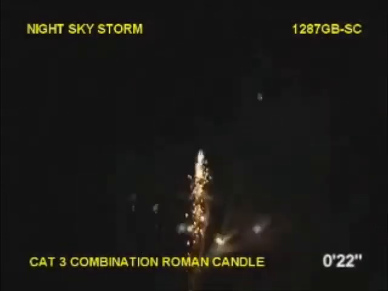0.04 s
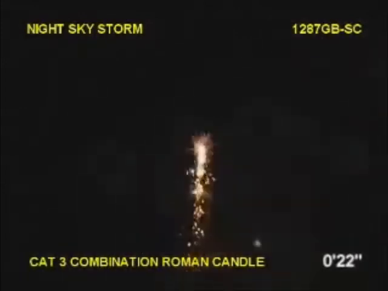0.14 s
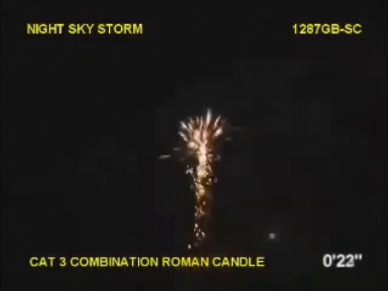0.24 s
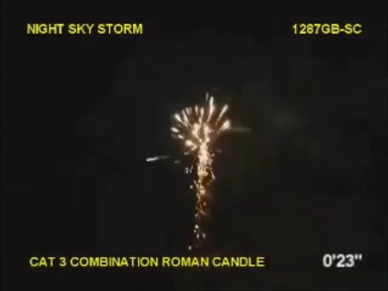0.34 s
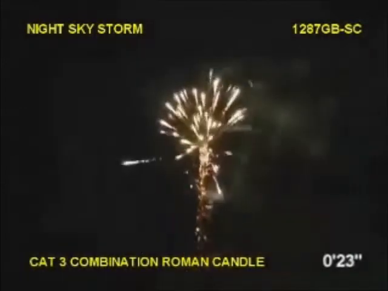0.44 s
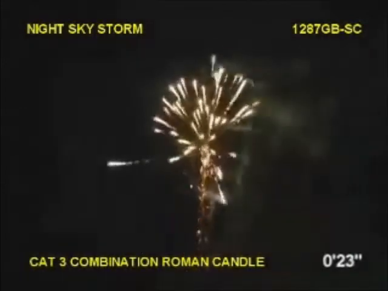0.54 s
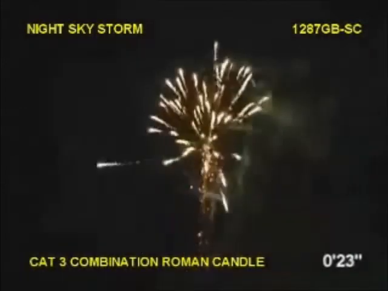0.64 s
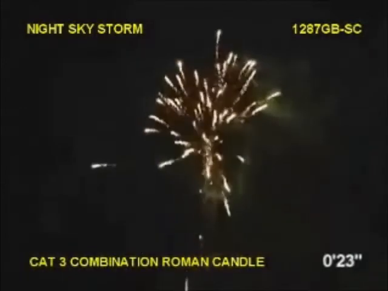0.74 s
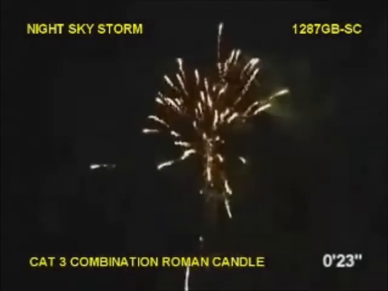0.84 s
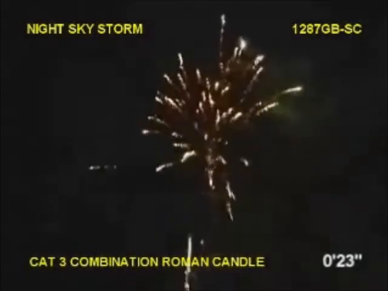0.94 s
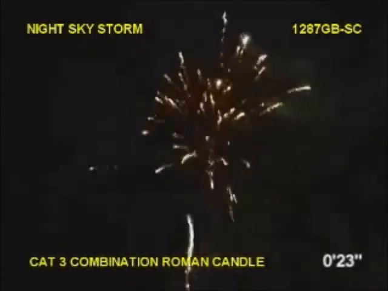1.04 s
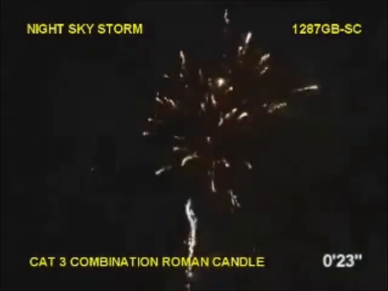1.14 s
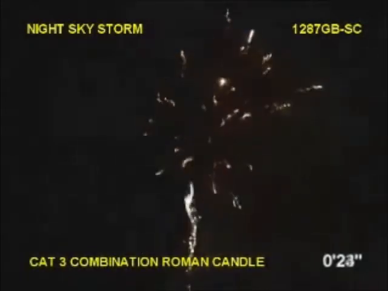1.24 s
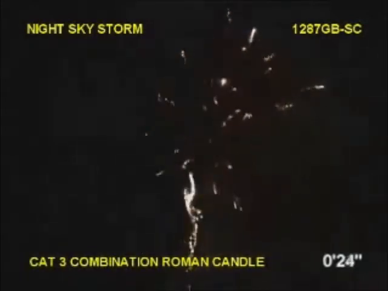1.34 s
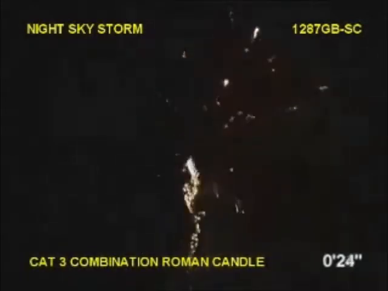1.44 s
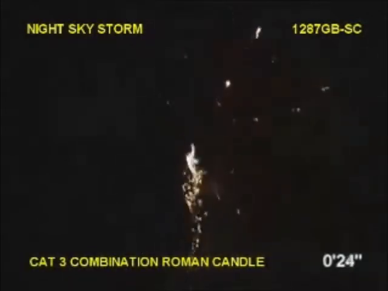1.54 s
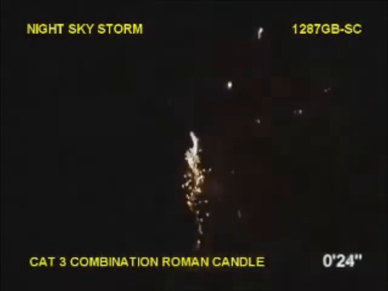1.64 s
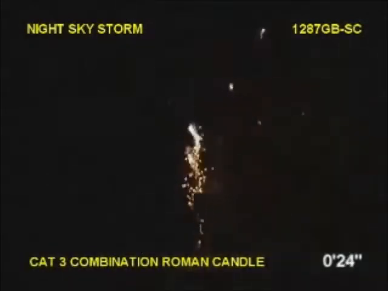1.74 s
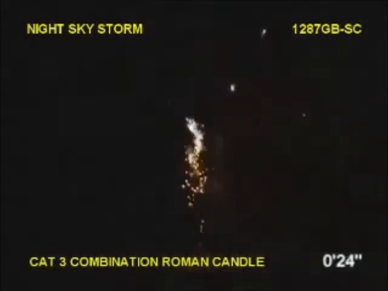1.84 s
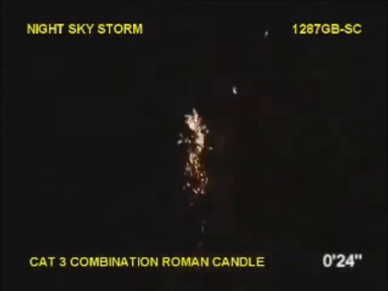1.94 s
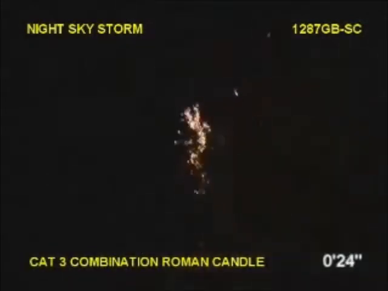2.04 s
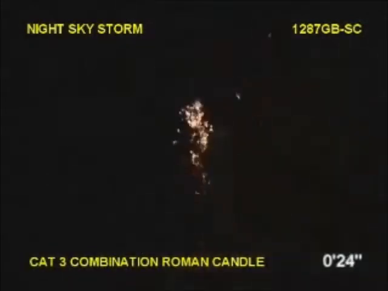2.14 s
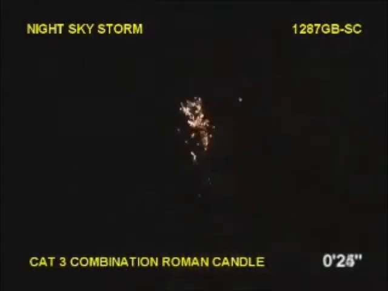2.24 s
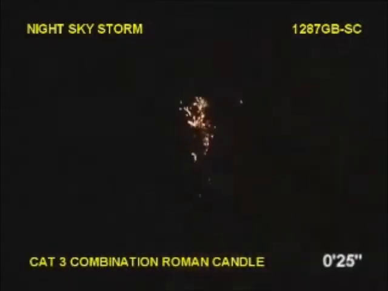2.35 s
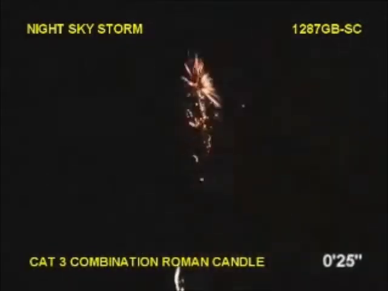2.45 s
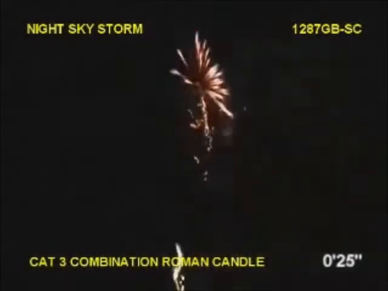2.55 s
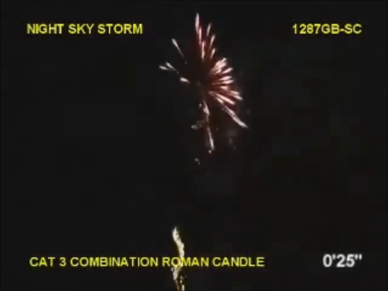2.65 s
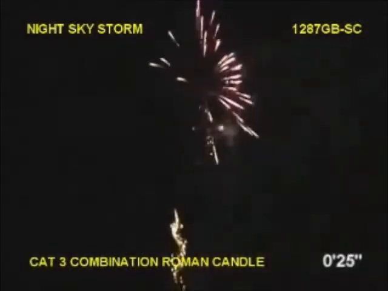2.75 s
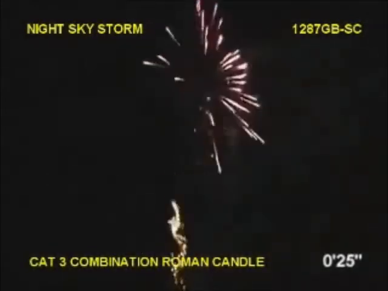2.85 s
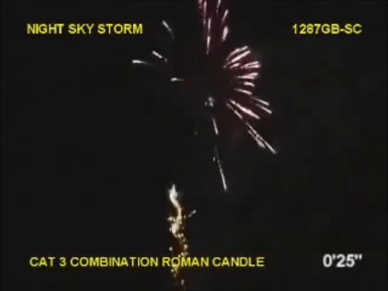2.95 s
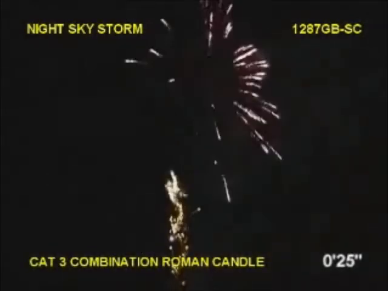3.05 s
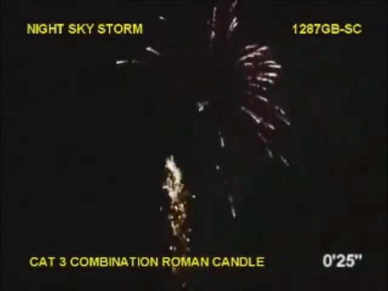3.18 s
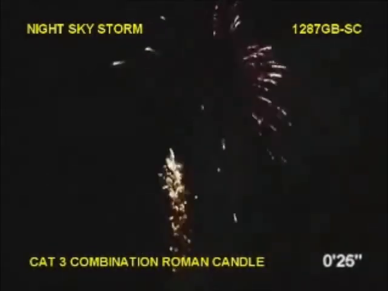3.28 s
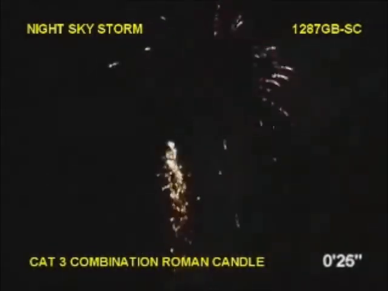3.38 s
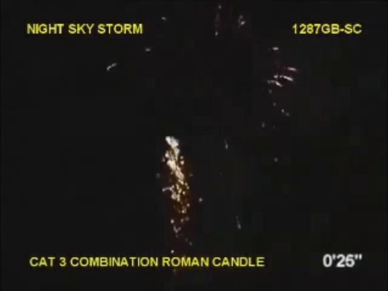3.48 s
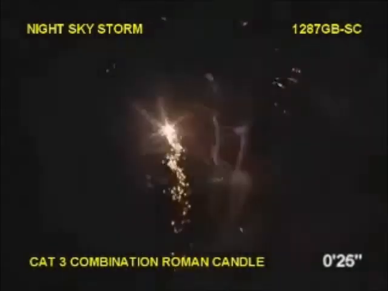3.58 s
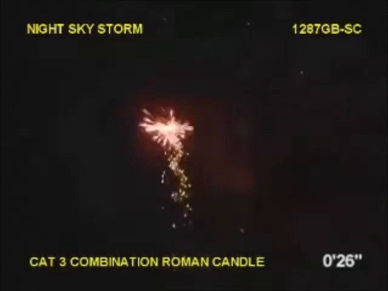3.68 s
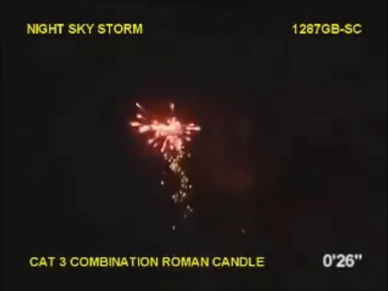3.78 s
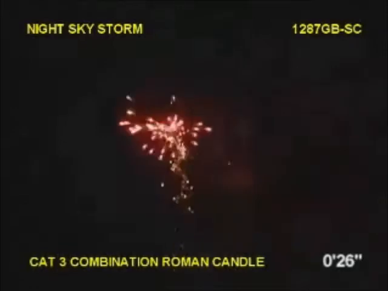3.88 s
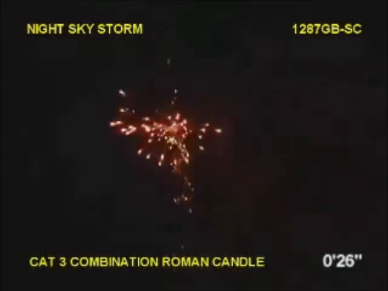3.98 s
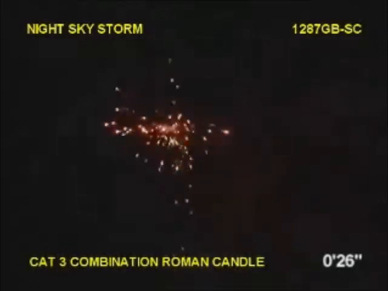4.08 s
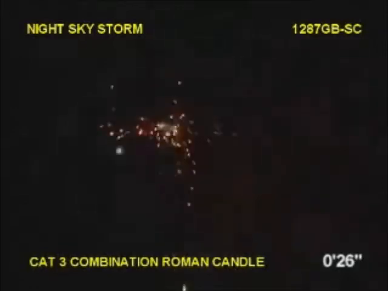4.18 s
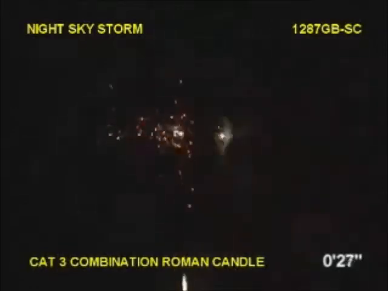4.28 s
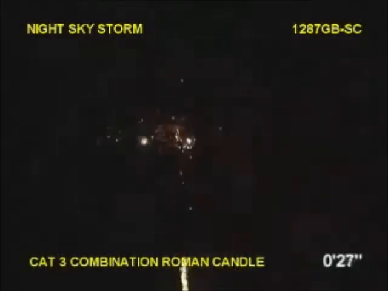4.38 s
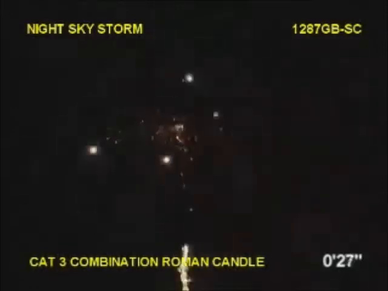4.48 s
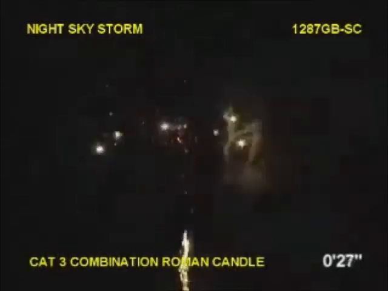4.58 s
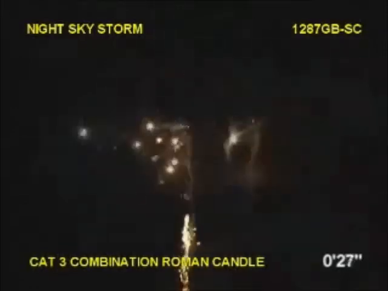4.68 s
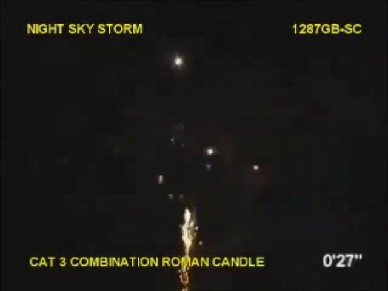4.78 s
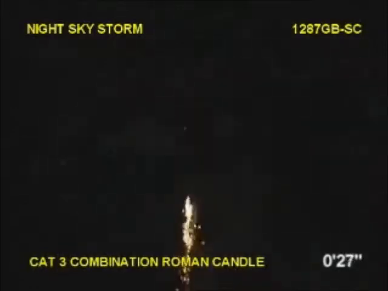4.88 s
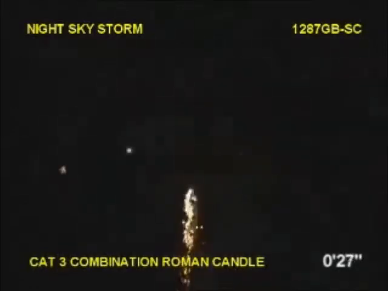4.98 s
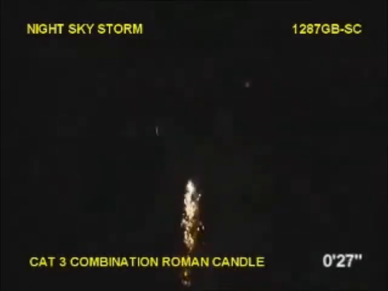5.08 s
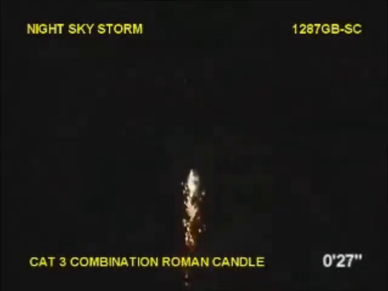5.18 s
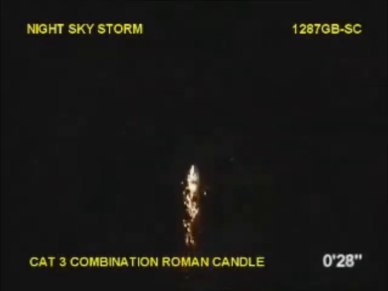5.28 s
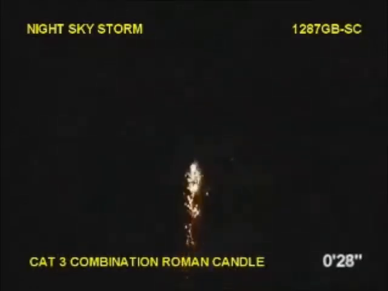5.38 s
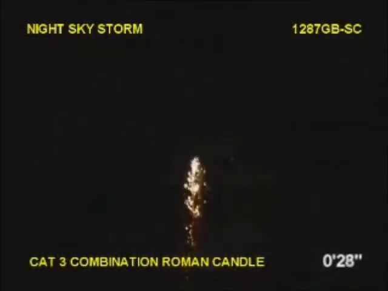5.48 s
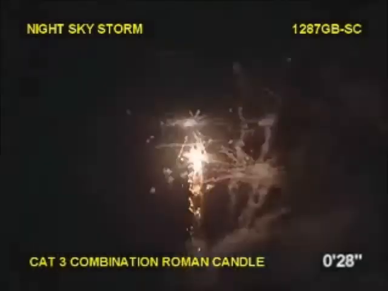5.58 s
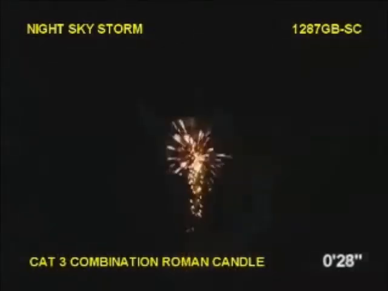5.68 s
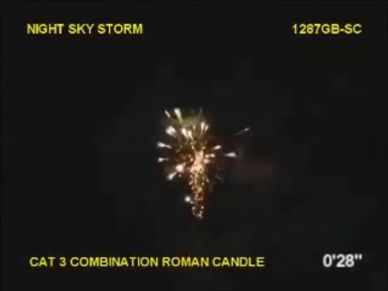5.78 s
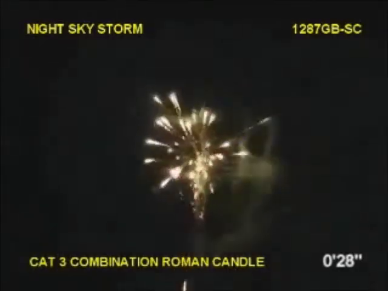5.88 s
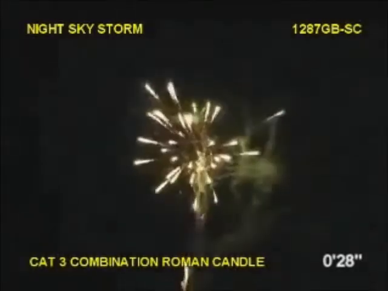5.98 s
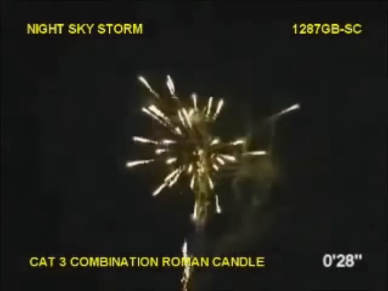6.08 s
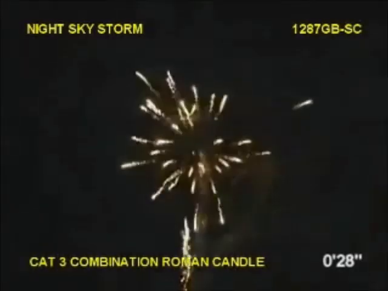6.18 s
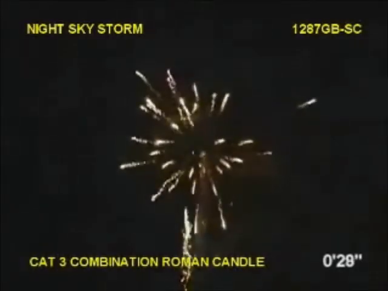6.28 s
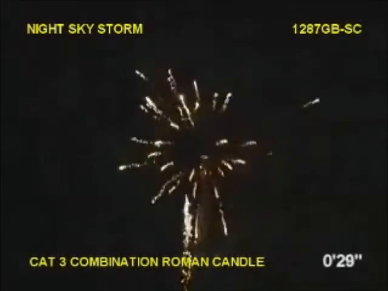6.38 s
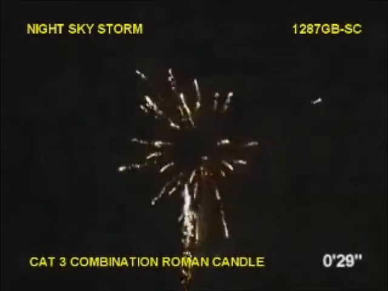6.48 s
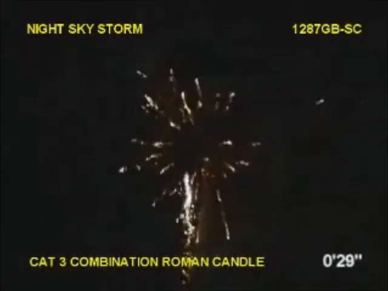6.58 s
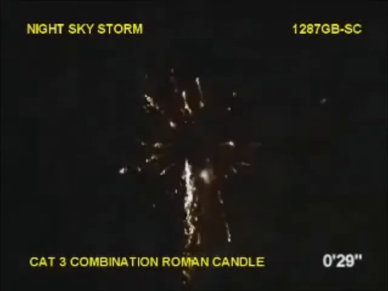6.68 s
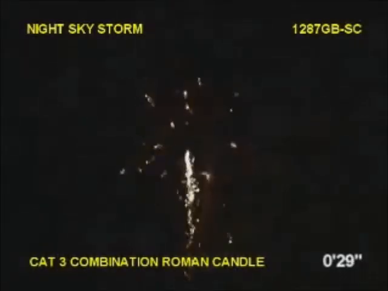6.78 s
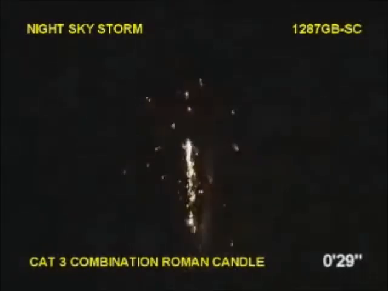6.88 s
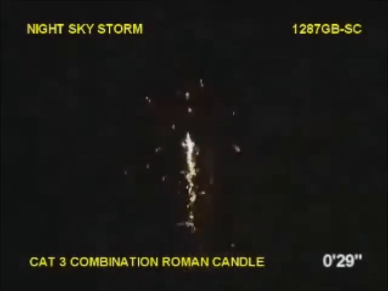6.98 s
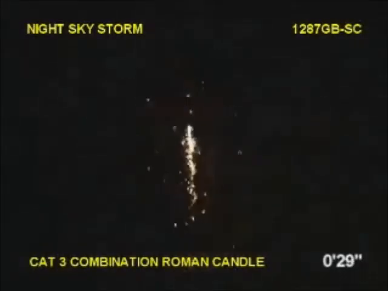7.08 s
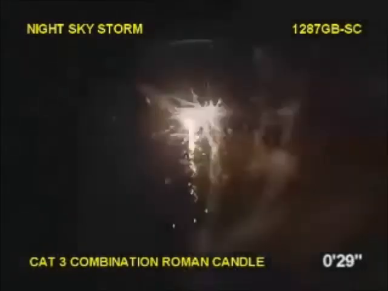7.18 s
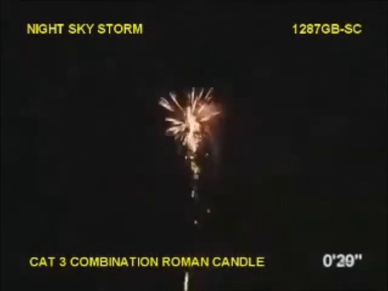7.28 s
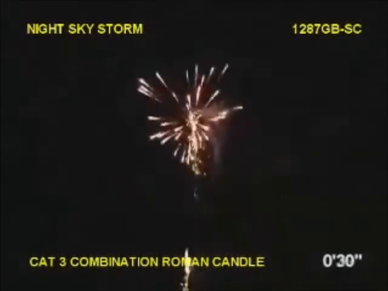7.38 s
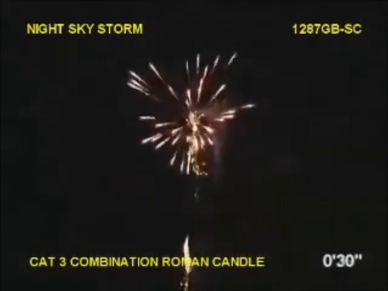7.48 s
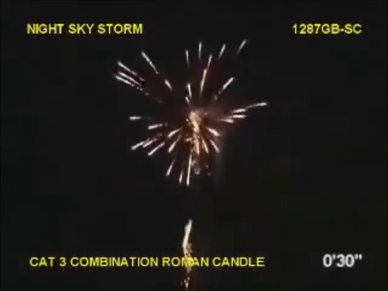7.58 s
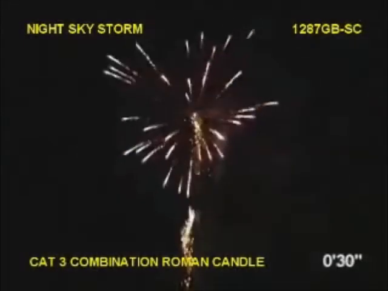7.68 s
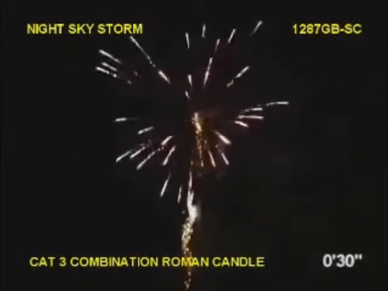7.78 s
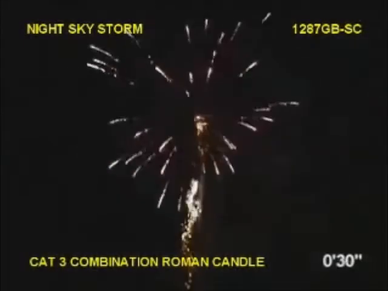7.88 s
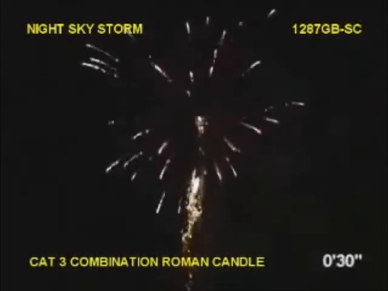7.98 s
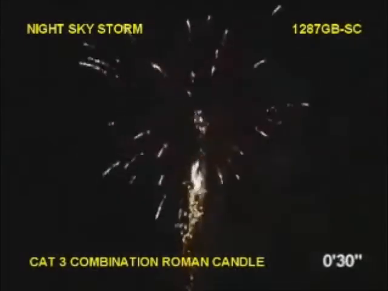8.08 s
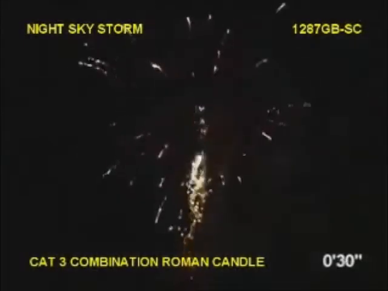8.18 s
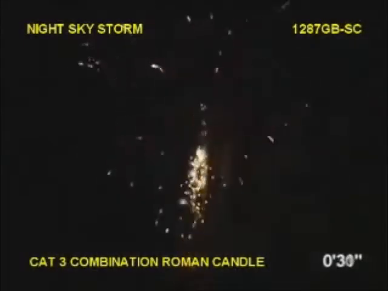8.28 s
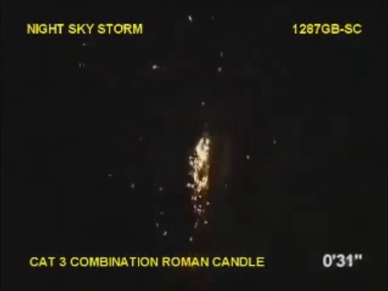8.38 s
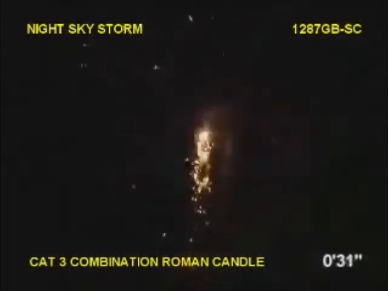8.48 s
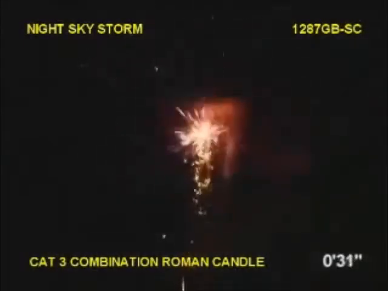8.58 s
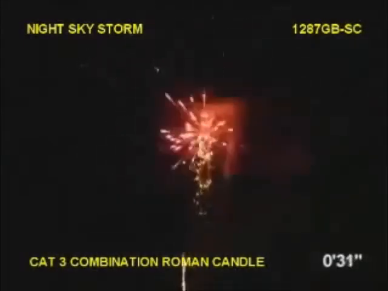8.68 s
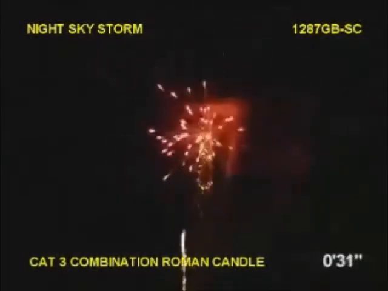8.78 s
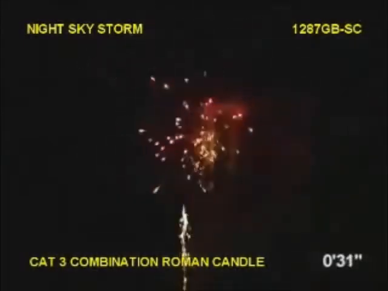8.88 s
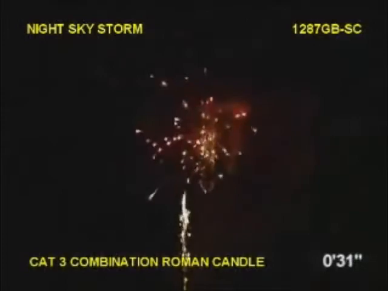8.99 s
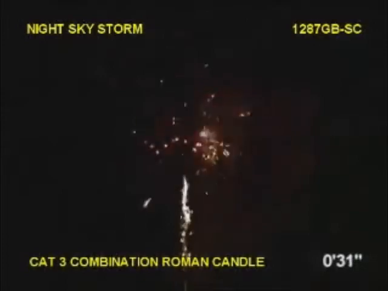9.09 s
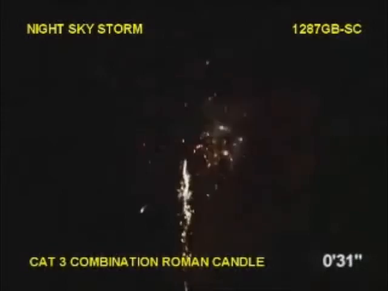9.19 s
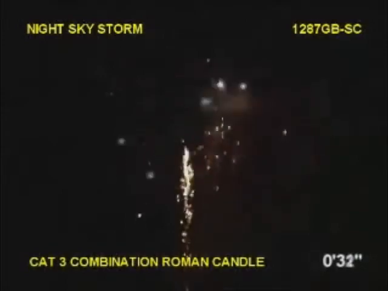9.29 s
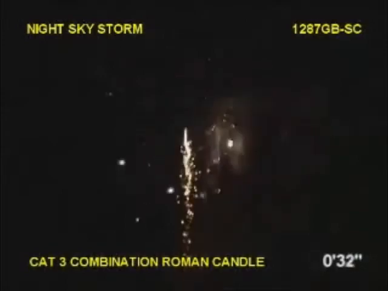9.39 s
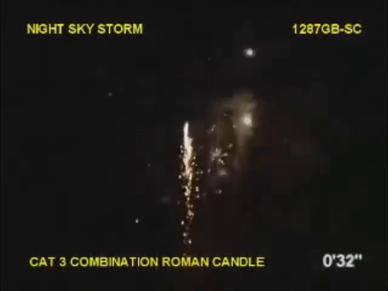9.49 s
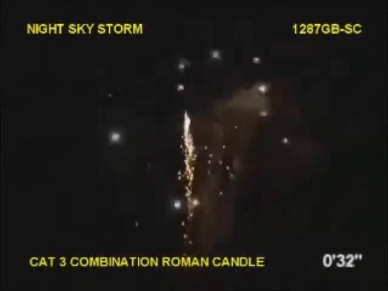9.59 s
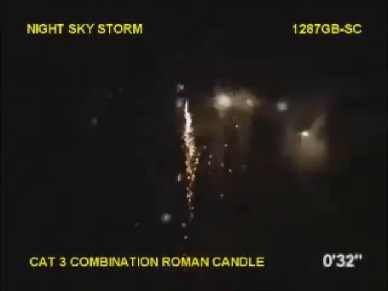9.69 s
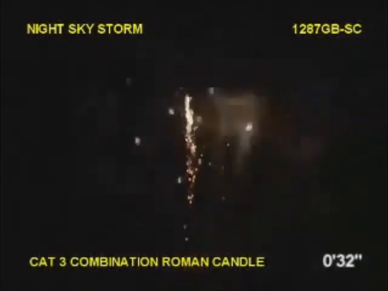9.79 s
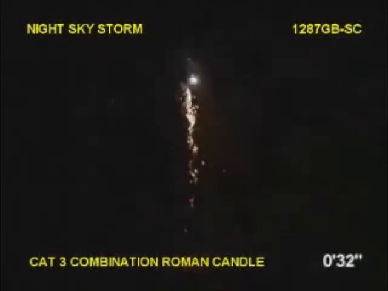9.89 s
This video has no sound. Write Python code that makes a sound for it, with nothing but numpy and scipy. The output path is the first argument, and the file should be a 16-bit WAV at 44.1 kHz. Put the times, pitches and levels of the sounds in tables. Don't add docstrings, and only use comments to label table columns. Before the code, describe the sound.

Spaced firework bangs crack and echo off nearby walls, with cardboard launch thumps between them and dense, snappy crackling coming in volleys.

```python
import sys
import numpy as np
from scipy import signal
from scipy.fft import rfft, irfft
from scipy.io import wavfile
from scipy.ndimage import uniform_filter1d

SR = 44100
rng = np.random.default_rng(int(sys.argv[2]) if len(sys.argv) > 2 else 0)


def invert_db(x):
    u = np.asarray(x, float) / 20
    return 10 ** u


def int16_out(signal):
    q = np.round(np.clip(np.atleast_2d(signal).T, -1, 1) * 32767)
    wavfile.write(sys.argv[1], SR, q.astype(np.int16))


N = 438351

# (time at left [s], time at right [s], charge level [dB], ground echo at right [ms])
BURSTS = [
    (.3665, .4565, -1.5, 2.6),
    (2.6236, 2.7103, 0., 3.2),
    (3.8435, 3.9326, .5, 2.6),
    (5.8377, 5.9286, 0., 2.6),
    (7.3973, 7.4865, .5, 2.6),
    (8.6932, 8.7833, .5, 2.5),
]
# (delay [ms], level [dB], bandwidth [Hz], polarity [factor])
BURST_WALLS = [
    [(158, -14, 790, 0.53), (210.5, -14.5, 1200, 0.88), (243, -15, 900, 1), (252, -28, 2100, 0.34), (430, -8, 410, 0.39)],
    [(14, -18, 3800, 1), (61.1, -22.5, 1050, 0.64), (107.6, -7.5, 3800, -0.24), (148.9, -28.5, 3000, 1), (159.5, -18, 1800, -0.37), (164.3, -9, 286, 0.36), (232, -37, 3700, 0.92), (239.3, -24.5, 570, -1.24), (342, -37, 1000, -0.48), (401.7, -33, 180, 1)],
]


def bursts():
    near = dull(blast(push_ms=.3, ring_hz=260, ring_ms=1.8, ring_db=-9., turn=.54), 2400)
    far = dull(blast(push_ms=.6, ring_hz=285, ring_ms=2.0, ring_db=-11., turn=.58), 4400)
    left, right = np.zeros((2, N))
    for s, _, db, _ in BURSTS:
        left += shot(s, db - 0.5, near, .57, -0.3, BURST_WALLS[0], side=0, wet_db=0.5)
    for _, s, db, echo_ms in BURSTS:
        right += shot(s, db + 19.0, far, echo_ms, 0.32, BURST_WALLS[1], side=1, wet_db=-10.5)
    return np.array([left, right])


# (time at left [s], time at right [s], charge level [dB])
LIFTS = [
    (0.611, 0.715, 12),
    (2.2192, 2.3174, 6),
    (5.718, 5.816, 6),
    (7.074, 7.174, 7.5),
    (8.472, 8.571, 10.5),
]
# (delay [ms], level [dB], bandwidth [Hz], polarity [factor])
LIFT_WALLS = [
    [(33.3, 3, 580, 0.21), (221, -11.5, 1300, -0.85), (248, -8, 700, 0.69)],
    [(14.03, -13, 1600, 0.65), (31.4, 9.5, 530, 0.13), (46, -4.5, 760, 0.6), (109.7, -8.5, 4000, -0.84), (155.2, -14.5, 2500, 1), (250.4, -5.5, 1400, 0.23), (287, -19.5, 1200, 0.77)],
]


def lifts():
    thump = dull(blast(push_ms=.65, ring_hz=300, ring_ms=2.8, ring_db=-1.5), 2000)
    left, right = np.zeros((2, N))
    for s, _, db in LIFTS:
        left += shot(s, db - 28.5, thump, 0.45, -18.0, LIFT_WALLS[0], side=0, wet_db=-1.5)
    for _, s, db in LIFTS:
        right += shot(s, db - 16.5, thump, .25, -40.0, LIFT_WALLS[1], side=1, wet_db=-2.5)
    return np.array([left, right])


def blast(push_ms, ring_hz, ring_ms, ring_db, turn=0):
    ms = np.arange(1200) * 1000 / SR
    front = (1 - ms / push_ms) * np.exp(-ms / push_ms)
    swing = np.sin(2 * np.pi * (ring_hz * ms / 1000 - turn)) * np.exp(-ms / ring_ms)
    return front + invert_db(ring_db) * swing


def shot(s, db, pulse, ground_ms, ground_db, walls, side, wet_db):
    lag = round(ground_ms * SR / 1000)
    sound = np.zeros(2 * SR)
    sound[:len(pulse)] += pulse
    sound[lag:lag + len(pulse)] += invert_db(ground_db) * pulse
    direct = np.pad(pulse, (0, 800)) + invert_db(-14.5) * sound[:2000]
    direct = direct - 0.43 * dull(direct, 440)
    for ms, wall_db, hz, polarity in walls:
        start = round(ms * rng.uniform(.99, 1.01) * SR / 1000)
        sound[start:start + 2000] += polarity * invert_db(wall_db) * dull(direct, hz)
    wet = signal.oaconvolve(scatter(side, size=2 * SR), dull(pulse, 3930.0))[:2 * SR]
    sound += invert_db(wet_db) * wet
    out = np.zeros(N + 2 * SR)
    start = round(s * SR)
    out[start:start + 2 * SR] = invert_db(db) * sound
    return out[:N]


# (delay [s], level [dB])
SCATTER = [
    [(.004, -9), (.03, -25.5), (.08, -23.5), (.13, -40), (.25, -29.5), (.42, -34.5), (.7, -36.5), (1.2, -51.5), (1.9, -75)],
    [(.02, -11), (.04, -34.5), (.095, -27), (.115, -18), (.2, -23), (.3, -29.5), (.6, -32.5), (1.2, -47.5), (1.9, -60)],
]
# (frequency [Hz], level [dB])
SCATTER_TONE = [(100, 8), (200, -2.5), (320, -4.5), (550, 6), (1500, -3.5), (5000, 2)]
# (frequency [Hz], extra loss [dB/s])
TREBLE_LOSS = [(150, -3), (500, 8.5), (1500, 3.5), (4000, 17), (8000, 21.5)]


def scatter(side, size):
    spots = np.arange(0, size - 20, 20) + rng.integers(0, 20, (size - 1) // 20)
    bounces = rng.standard_normal(len(spots))
    uneven_db = 2.5 * np.minimum(rng.exponential(1, len(spots)), 3)
    taps = np.zeros(size)
    taps[spots] = bounces * invert_db(uneven_db)
    hz, t, z = signal.stft(taps, SR, nperseg=256)
    tone_db = read(SCATTER_TONE, hz)[:, None] - t * read(TREBLE_LOSS, hz)[:, None]
    tail = signal.istft(z * invert_db(tone_db), SR, nperseg=256)[1][:size]
    s, db = np.transpose(SCATTER[side])
    return tail * invert_db(np.interp(np.arange(size) / SR, s, db, left=-90) - 12)


LEFT_LEAD_MS, LEAD_PER_ECHO_MS, USUAL_ECHO_MS = 90.1, -4.9, 2.6


def crackle():
    pop = dull(blast(push_ms=.18, ring_hz=900, ring_ms=.4, ring_db=-12.), 3800)
    s, db, echo_ms = stars()
    lead_ms = LEFT_LEAD_MS + LEAD_PER_ECHO_MS * (echo_ms - USUAL_ECHO_MS)
    left = train(s - lead_ms / 1000, db - 12) + swarm(lead_s=0.15, per_s=300, db=4.9)
    left = left + invert_db(-3.) * np.roll(left, round(.58 * SR / 1000))
    faint = swarm(lead_s=0, per_s=200, db=17.5)
    bounce = train(s + echo_ms / 1000, db) + np.roll(faint, round(2.4 * SR / 1000))
    right = train(s, db) + faint + invert_db(-3.) * dull(bounce, 7500)
    wet = [signal.oaconvolve(x, scatter(side, size=SR))[:N] for side, x in enumerate((left, right))]
    heard = invert_db(4.6) * (np.array([left, right]) + invert_db([[-3.], [-6.]]) * np.array(wet))
    return signal.oaconvolve(heard, pop[None], axes=1)[:, :N]


# (time at right [s],
# peak level [dB], ground echo [ms])
CLEAR_POPS = [(.8245, -17, 2.1), (.8618, -12, 1.5), (1.2297, -22, 2.4), (1.2389, -23, 2.4), (1.4857, -25, 1.7),
              (1.7293, -25, 1.5), (2.0212, -24, 2.3), (2.1293, -24, 2.3), (2.1718, -20, 2.6),
              (2.2324, -22, 2.6), (2.4237, -21, 2.7), (2.4738, -22, 2.6), (2.5663, -22, 2.6),
              (3.0382, -20, 2.6), (3.1025, -19, 2.8), (3.3283, -23, 3.1), (3.5374, -18, 3.0),
              (3.6632, -22, 2.2), (3.7742, -21, 2.0), (4.3479, -18, 2.6), (5.9019, -11, 2.3),
              (6.5633, -19, 2.4), (6.6715, -20, 1.6), (6.8497, -16, 1.6), (6.9, -20, 1.8), (7.234, -18, 1.8),
              (7.2815, -19, 1.6), (7.9019, -18, 2.6), (8.3462, -19, 2.8), (9.21, -19, 2.3),
              (.0011, -13, 2.1), (.1613, -12, 2.0), (.2662, -11, 1.9), (.2947, -12, 2.1), (.3217, -11, 2.1),
             (.3965, -12, 1.8), (4.5588, -16, 2.6), (4.6013, -17, 2.8), (4.6434, -15, 2.7),
             (4.6863, -15, 2.9), (4.7418, -15, 2.3), (4.8431, -13, 2.8), (4.9032, -12, 2.7),
             (4.9392, -11, 2.7), (4.9788, -11, 2.5), (5.0505, -10, 2.6), (5.1664, -10, 2.7),
             (5.2078, -13, 2.7), (5.256, -9, 2.4), (5.2659, -11, 2.4), (5.2769, -10, 2.5), (5.35, -13, 2.6),
             (5.3919, -9, 2.5), (5.4124, -11, 2.4), (9.5461, -15, 3.1), (9.5873, -13, 3.1),
             (9.6076, -12, 2.8), (9.7372, -12, 2.3), (9.8498, -10, 2.5), (9.8755, -12, 2.2)]


def stars():
    calm_per_s, most_per_s = 6, 130
    span = N / SR + LEFT_LEAD_MS / 1000
    count = round(span * most_per_s)
    when, luck = rng.random((count, 2)).T
    size, height = np.clip(rng.standard_normal((count, 2)).T, -2, 2)
    s = (np.arange(count) + when) / most_per_s
    swell_db = np.interp(s, *np.transpose(SWARM)) + 57
    db = -23.5 + 0.63 * swell_db + size
    fired = luck < calm_per_s * invert_db(1.3 * swell_db) / most_per_s
    echo_ms = USUAL_ECHO_MS + .45 * (height - .5)
    chance = np.array([s, db, echo_ms])[:, fired]
    return np.hstack([np.transpose(CLEAR_POPS), chance])


# (time [s], level [dB])
SWARM = [(0, -61.5), (.12, -40.5), (.42, -41), (.5, -46), (1.2, -61.5), (2.0, -61.5), (2.6, -56),
         (3.8, -57.5), (4.4, -62.5), (4.7, -50), (5.03, -39), (5.2, -46), (5.5, -58.5), (7.6, -55),
         (9.3, -54), (9.55, -50.5), (9.7, -43.5), (10.04, -38)]


def swarm(lead_s, per_s, db):
    s, level_db = np.transpose(SWARM)
    clumps = np.clip(uniform_filter1d(rng.standard_normal(N), 900) * 30, -2, 1.2)
    chance = per_s / SR * np.exp(.9 * clumps)
    spread_db = 2.5 * np.minimum(rng.exponential(1, N), 3)
    size_db = np.interp(np.arange(N) / SR + lead_s, s, level_db) + db + spread_db
    return invert_db(size_db) * (rng.random(N) < chance)


def train(s, db):
    out = np.zeros(N)
    at = np.round(s * SR).astype(int)
    heard = (at >= 0) & (at < N)
    np.add.at(out, at[heard], invert_db(db[heard]))
    return out


# (frequency [Hz], density [dB per Hz])
AIR = [(25, -12.5), (80, 7), (250, -3), (800, -5), (2500, -14), (6500, -28), (9000, -26.5)]


def night_air():
    return invert_db([[-60.], [-50.]]) * noise(AIR)


def noise(points):
    z = rfft(rng.standard_normal((2, N))) * invert_db(read(points, np.fft.rfftfreq(N, 1 / SR)))
    x = irfft(z, N)
    return x / x.std()


def read(points, x):
    f, value = np.transpose(points)
    return np.interp(np.log(x + 1), np.log(f + 1), value)


def dull(x, hz):
    return signal.lfilter(*signal.butter(2, min(hz, SR / 3), fs=SR), x)


def colour(x, points):
    log_gain = read(points, np.fft.rfftfreq(2048, 1 / SR)) * np.log(10) / 20
    mirrored = np.concatenate([log_gain, log_gain[-2:0:-1]])
    phase = -signal.hilbert(mirrored).imag[:len(log_gain)]
    return signal.oaconvolve(x, irfft(np.exp(log_gain + 1j * phase))[None], axes=1)[:, :N]


def scene():
    return bursts() + lifts() + crackle() + night_air()


def roll_off(x):
    return signal.sosfilt(signal.butter(12, 10390, fs=SR, output="sos"), x)


# (frequency [Hz], level [dB])
MIC = [(25, -18.5), (80, -7.5), (200, 3.5), (500, -2), (3000, 1.5), (4400, 3.5), (6500, 17.5), (8000, 14.5),
       (12000, -24)]
# (frequency [Hz], level [dB])
EDGE = [(7000, 1.5), (8200, 1.5), (9300, 6), (10000, -9), (11500, -53)]


def record(dry):
    x = colour(dry, MIC)
    ceiling = invert_db([[-7.], [-7.5]])
    x = x / (1 + abs(x / ceiling) ** 10) ** (1 / 10)
    period = 147
    comb = np.zeros(30 * period)
    comb[period::period] = -.17 * .78 ** np.arange(29)
    x = x + signal.oaconvolve(x, dull(comb, 8000)[None], axes=1)[:, :N]
    x = signal.lfilter(*signal.iirnotch(150, 6., SR), x)
    return roll_off(colour(x, EDGE))


dry = scene()
out = record(dry)
int16_out(out)
```